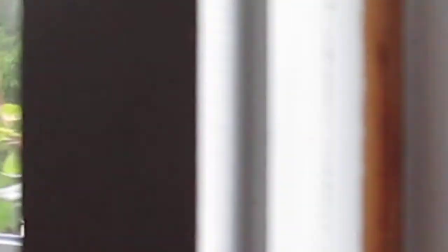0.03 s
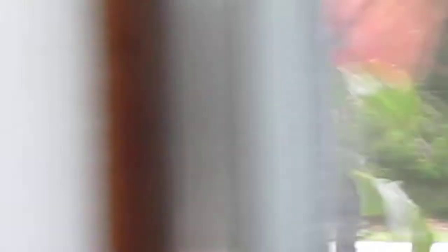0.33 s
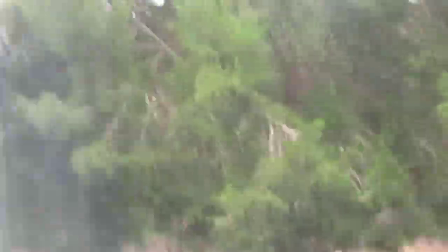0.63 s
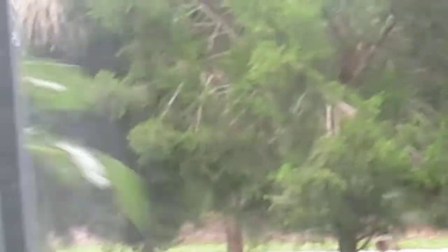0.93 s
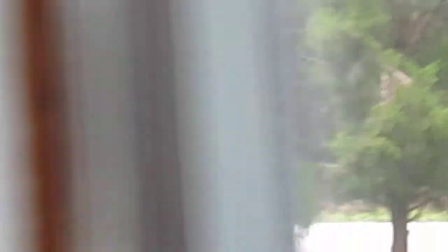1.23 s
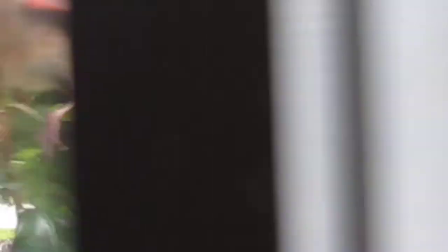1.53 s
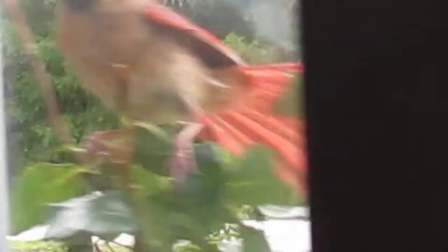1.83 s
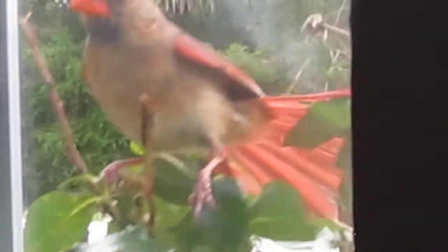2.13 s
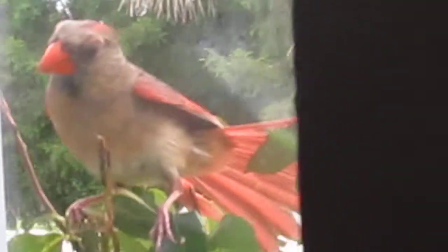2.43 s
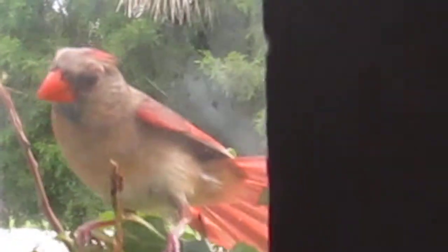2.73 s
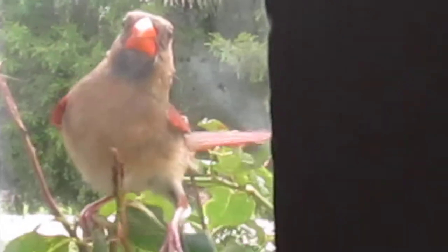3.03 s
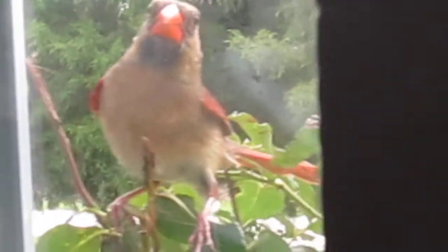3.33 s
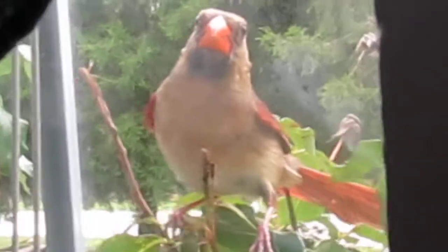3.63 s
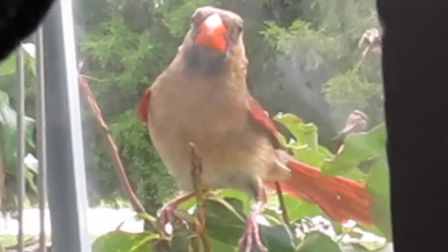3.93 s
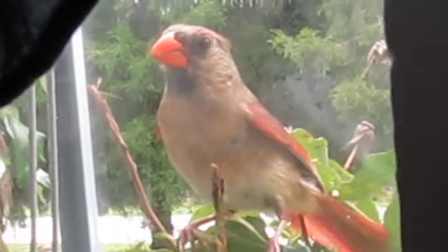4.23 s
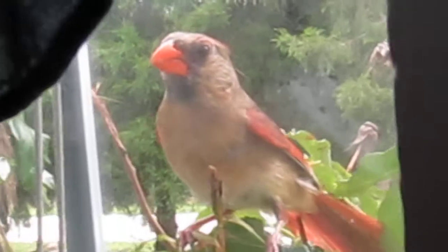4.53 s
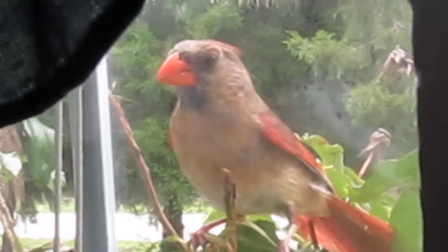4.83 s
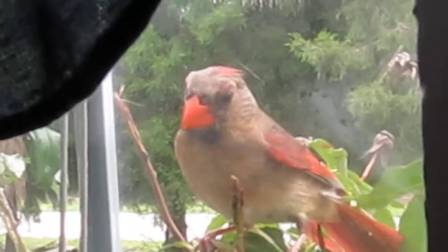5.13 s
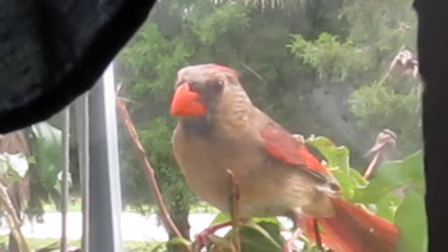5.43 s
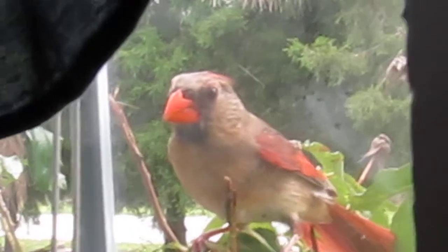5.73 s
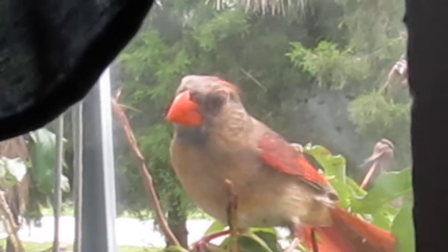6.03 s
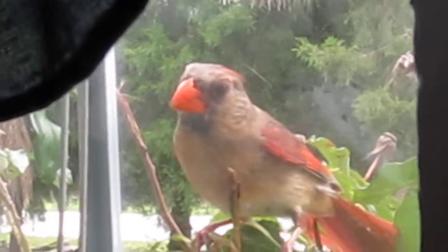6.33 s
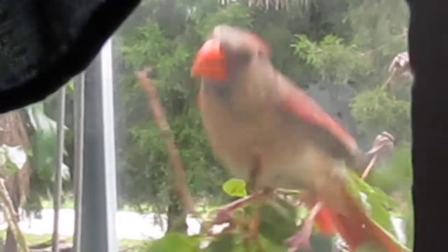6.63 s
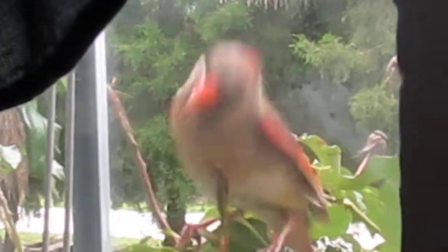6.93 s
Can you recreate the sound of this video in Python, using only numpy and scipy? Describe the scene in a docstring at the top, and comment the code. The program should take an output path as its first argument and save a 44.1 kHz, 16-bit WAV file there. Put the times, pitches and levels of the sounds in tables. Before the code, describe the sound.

In a quiet room, a hand-held camera picks up steady hiss, low hum and a few barely audible bird chips from outdoors. Early on, a bird hits the window twice, beak ticking and the pane ringing briefly. A few light handling clicks come right beside the microphone. A long lull follows, then two more short, sharp knocks on the glass about half a second apart.

```python
"""A quiet room, heard through a hand-held camera: hum, hiss and the camera's faint whine run throughout.
Thin bird chips come from outside, the camera clicks and the hand slides on its case. At 0.7 and 1.3 s a
bird knocks on the window, each time a beak strike and a second touch: the pane booms and the room answers
briefly. More clicks and a few chips follow, then the bird knocks twice again, at 6.5 and 7 s."""
import sys
import numpy as np
from scipy import signal
from scipy.fft import rfft, irfft
from scipy.io import wavfile

SR = 44100
rng = np.random.default_rng(int(sys.argv[2]) if len(sys.argv) > 2 else 0)


def bounce(signal):
    """Save signal as a 16-bit WAV file at the path given by the first command-line argument."""
    frames = np.transpose(np.atleast_2d(signal))
    limited = np.clip(frames, -1, 1)
    pcm = np.round(limited * 32767).astype(np.int16)
    wavfile.write(sys.argv[1], SR, pcm)


N = 312228
TIME = np.arange(N) / SR
# decay of the room's reverb: (frequency [Hz], t60 [s])
ROOM_DECAY = [(100, 0.4), (500, 0.28), (1500, 0.21), (5000, 0.22), (12000, 0.15)]


def bird_at_window(low_cut_hz=68):
    """All the bird's blows on the glass, with the deepest lows cut away."""
    # (time [s], push level [dB], push cutoff [Hz], tick level [dB], tick centre [Hz], place on pane [0-1])
    blows = [(0.6814, -20, 460, -22.5, 6100, 0.38), (0.6937, -24.5, 820, -24.5, 5800, 0.05),
             (1.2827, -28, 1000, -18, 1436, 0.27), (1.2839, -18.5, 1900, -22, 4100, 0.28),
             (1.2962, -27, 1610, -27, 6800, 0.58), (1.303, -27, 1300, -34, 4030, 0.55),
             (6.5273, -20, 1560, -18, 5200, 0.96), (6.5466, -26, 500, -18, 5200, 0.5),
             (6.9635, -25.5, 1700, -26, 2800, 0.77), (6.99, -30, 1300, -46, 4800, 0.88)]
    out = np.zeros(N)
    for start, *contact, place in blows:
        add(out, start, knock(contact, place))
    return signal.sosfilt(signal.butter(4, low_cut_hz, "highpass", fs=SR, output="sos"), out)


def knock(contact, place, crack_db=30, room_db=20, crack_rise_s=0.0005, room_rise_s=0.002,
          swell_s=0.0021, in_step_hz=300):
    """One blow: a dry crack of crowded glass modes, the ring of the strong ones, and the room's answer."""
    # modes of the framed pane: (frequency [Hz], level at place 0 [dB], level at place 1 [dB], t60 [s])
    pane_modes = [(85.7, -22, -15, 0.24), (98, -10.5, -13.5, 0.17), (123, -30, -21, 0.084),
                  (157, -19, -11, 0.13), (224, 3, -36, 0.055), (256.7, -0.5, -6.5, 0.23),
                  (328.4, -10.5, -14, 0.063), (362, -21, -18, 0.144), (417, -20, 1.5, 0.17),
                  (427.4, 1.5, -14, 0.1), (514.5, -13.5, -0.5, 0.059), (559, -39, 3.5, 0.095),
                  (600.4, -6.5, -1.5, 0.13), (623, -2, -9, 0.14), (682, -30, -7, 0.16),
                  (759, -24.5, -30, 0.28), (878, -18, -3, 0.06), (979, -11.5, -9.5, 0.093),
                  (1037, -15.5, -8, 0.078), (1154, -12, -4, 0.061), (1347, -20, -12, 0.085),
                  (1440, -12, -29, 0.15), (1528, -6, -3, 0.051), (2120, -9, -19, 0.082),
                  (2510, -11, -21, 0.13), (4000, -31, -32, 0.23), (4230, -13, -32, 0.11),
                  (4750, -22, -4.5, 0.033), (5730, -33, -33, 0.067)]
    # tone of the pane's crowd of fast-dying modes: (frequency [Hz], level [dB])
    crack_spectrum = [(50, -10), (140, 8.5), (560, 3.5), (800, -1.5), (1050, -1), (1550, 2.5), (1800, -2),
                      (2700, -3.5), (3400, -5), (5600, -11), (7400, -13.5), (9400, -13.5), (11500, -28.5),
                      (16000, -53)]
    # decay of that crowd, shortest in the top treble: (frequency [Hz], t60 [s])
    crack_decay = [(200, 0.021), (1500, 0.033), (4500, 0.039), (7000, 0.013), (12000, 0.016)]
    t = np.arange(SR // 2) / SR
    ring = np.zeros(len(t))
    for k, (hz, db_at_0, db_at_1, t60) in enumerate(pane_modes):
        sign = 1 if hz < in_step_hz else (-1) ** k  # the low modes start together as the pane bulges
        level_db = contact_db(hz, *contact) + db_at_0 + (db_at_1 - db_at_0) * place
        ring += sign * amp(level_db - 60 * t / t60) * np.sin(2 * np.pi * hz * t)
    ring *= 1 - np.exp(-t / swell_s)  # standing waves build as the bend crosses the glass
    crack = scatter(t, crack_decay, size=64) * (1 - np.exp(-t / crack_rise_s))
    room = scatter(t, ROOM_DECAY) * (1 - np.exp(-t / room_rise_s))
    wash = amp(crack_db) * crack + amp(room_db) * room
    return ring + colour(wash, lambda hz: read(crack_spectrum, hz) + contact_db(hz, *contact))


def contact_db(hz, push_db, push_hz, tick_db, tick_hz, push_slope=2.34, tick_slope=5,
               peak_db=9, peak_octaves=0.21):
    """Force spectrum of a blow: the soft body pushes the lows, the hard beak or claw ticks in the highs."""
    hz = hz + 1
    push = amp(push_db) ** 2 / (1 + (hz / push_hz) ** push_slope)
    boost_db = peak_db * np.exp(-(np.log2(hz / tick_hz) / peak_octaves) ** 2)
    tick = amp(tick_db + boost_db) ** 2 / (1 + (tick_hz / hz) ** tick_slope)
    return 10 * np.log10(push + tick)


def camera_clicks(rise_s=0.00012, snap_t60=0.012, room_db=-33):
    """Small plastic clicks right beside the microphone: a dry snap and a brief ring of the case."""
    # (time [s], level [dB], tone centre [Hz], roll-off to either side [dB/octave], ring gain [dB])
    clicks = [(0.1994, -40, 2320, 5.5, -0.5), (1.0855, -35.5, 1600, 5.5, -19),
              (1.6110, -26, 4300, 5.5, 14.5), (1.6139, -32, 4000, 10, 12.5), (2.617, -33, 5700, 15, -18),
              (2.6700, -38.5, 1600, -0.5, -19)]
    # modes of the camera's case: (frequency [Hz], level [dB], t60 [s])
    case_modes = [(1340, -23.5, 0.027), (2224, -11.5, 0.026), (2650, -8.5, 0.012), (3200, -13, 0.015),
                  (3610, -7, 0.011), (4530, -3, 0.0095), (5470, -16, 0.011), (5900, -11, .009),
                  (7720, -10.5, 0.0051), (8450, -17.5, 0.012), (11400, -14.5, 0.0063)]
    # bare contact of plastic: (frequency [Hz], level [dB])
    snap_spectrum = [(600, -39), (1400, 2.5), (2200, 7), (4500, -1.5), (10500, 1.5), (13500, -5),
                     (16000, -24)]
    out, t = np.zeros(N), np.arange(SR // 6) / SR
    for start, db, centre_hz, rolloff, ring_db in clicks:
        ring = sum((-1) ** k * amp(mode_db - 60 * t / t60) * np.sin(2 * np.pi * hz * t)
                   for k, (hz, mode_db, t60) in enumerate(case_modes))
        burst = rng.choice([-1., 1.], len(t)) * amp(-60 * t / snap_t60)
        snap = colour(burst, lambda hz: read(snap_spectrum, hz))
        click = (snap + amp(ring_db) * ring) * (1 - np.exp(-t / rise_s))
        click = colour(click, lambda hz: -rolloff * abs(np.log2((hz + 1) / centre_hz)))
        echo = signal.fftconvolve(click, scatter(t, ROOM_DECAY))[:len(t)]
        add(out, start, amp(db) * (click + amp(room_db) * echo))
    return out


def hand_rub(start_s=0.421, attack_s=0.033, hold_s=0.09, release_s=0.24, slide_db=-54.5, grip_db=-63.5):
    """Skin on the camera's case: one quick slide that eases off, over the faint rub of the resting hand."""
    # fine hiss over a low rumble: (frequency [Hz], level [dB])
    rub_spectrum = [(15, -6.5), (40, 5.5), (70, -5), (140, -11), (400, -26), (1600, -23), (3000, -23),
                    (7000, -28), (9500, -19), (10800, -26.5), (13000, -35), (16000, -42)]
    t = TIME - start_s
    attack = np.clip(t / attack_s, 0, 1)
    release = np.exp(-np.maximum(t - attack_s - hold_s, 0) / release_s)
    return noise(rub_spectrum) * np.hypot(amp(grip_db), amp(slide_db) * attack * release)


def bird_chips(top_hz=7500, bottom_hz=5500, length_s=0.023, trees_t60=0.17, level_db=-68.5):
    """Quick, falling whistles from a distance, smeared by the trees outside."""
    # onsets of the equally loud chips: (time [s])
    chip_times = [0.03, 0.21, 0.50, 0.82, 2.39, 2.475, 5.09, 5.445]
    out, t = np.zeros(N), np.arange(SR // 4) / SR
    sweep_hz = np.linspace(top_hz, bottom_hz, int(length_s * SR))
    whistle = np.sin(2 * np.pi * np.cumsum(sweep_hz) / SR) * np.hanning(len(sweep_hz))
    for start in chip_times:
        smeared = signal.fftconvolve(whistle, scatter(t, [(top_hz, trees_t60)]))
        add(out, start, amp(level_db) * smeared / np.std(smeared[:SR // 20]))
    return out


def room_tone(air_db=-55.0):
    """A steady bed of air and hiss, with thin tones whose phase wanders."""
    # room air and microphone hiss: (frequency [Hz], level [dB])
    air_spectrum = [(10, 7.5), (25, -9), (90, 1), (200, -0.5), (460, -4.5), (1000, -11.5), (2000, -16.5),
                    (4500, -21.5), (7200, -24.5), (8100, -24), (8800, -28), (9600, -28.5), (11500, -31),
                    (15800, -35.5)]
    # mains appliance hum and the camera's whine: (frequency [Hz], level [dB], width [Hz])
    hum_and_whine = [(115.4, -65, 2.6), (238.5, -67, 6.85), (475, -72.5, 11), (7887, -73.5, 0.38),
                     (7830, -76, 120.4)]
    out = amp(air_db) * noise(air_spectrum)
    for hz, db, width_hz in hum_and_whine:
        wander = np.cumsum(rng.standard_normal(N)) * np.sqrt(2 * np.pi * width_hz / SR)
        out += amp(db) * unit(np.sin(2 * np.pi * hz * TIME + wander))
    return out


def scatter(t, decay, size=256):
    """A dying tail of dense random echoes with energy 1; decay lists (frequency [Hz], t60 [s])."""
    hz, age, spectra = signal.stft(rng.choice([-1., 1.], len(t)), SR, nperseg=size)
    fade = amp(-60 * age / read(decay, hz)[:, None])
    tail = signal.istft(spectra * fade, SR, nperseg=size)[1][:len(t)]
    return tail / np.linalg.norm(tail)


def colour(x, db_at, size=4096):
    """Minimum-phase EQ whose gain in dB is the function db_at(Hz)."""
    log_gain = np.log(amp(db_at(abs(np.fft.fftfreq(size, 1 / SR)))))
    taps = np.fft.ifft(np.exp(np.conj(signal.hilbert(log_gain)))).real
    return signal.fftconvolve(x, taps[:size // 2])[:len(x)]


def noise(spectrum):
    """Steady noise of rms 1 with the given spectral shape."""
    gain = amp(read(spectrum, np.fft.rfftfreq(N, 1 / SR)))
    return unit(irfft(rfft(rng.standard_normal(N)) * gain, N))


def read(points, hz):
    """Interpolates a table of (frequency [Hz], value) on a log-frequency axis."""
    point_hz, value = np.transpose(points)
    return np.interp(np.log(hz + 1), np.log(point_hz + 1), value)


def amp(db):
    """Decibels to gain."""
    return 10 ** (np.asarray(db) / 20)


def unit(x):
    """Scales to rms 1."""
    return x / np.sqrt(np.mean(x ** 2) + 1e-20)


def add(mix, start_s, sound):
    """Mixes a sound in at the given time."""
    part = mix[round(start_s * SR):][:len(sound)]
    part += sound[:len(part)]


def scene():
    """Knocks, handling noise, chips and room tone in one mono mix."""
    return (bird_at_window() + camera_clicks() + bird_chips() + hand_rub() + room_tone())[None]


def record(dry):
    """A steep low-pass takes off the very top of the treble."""
    lowpass = signal.firwin(511, cutoff=15850, window=("kaiser", 9), fs=SR)
    return signal.oaconvolve(dry, lowpass[None], "same")


dry = scene()
out = record(dry)
bounce(out)
```